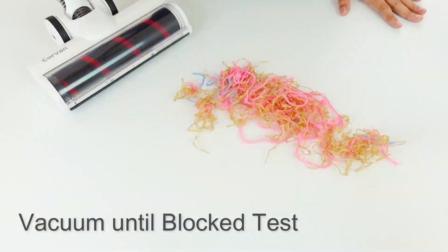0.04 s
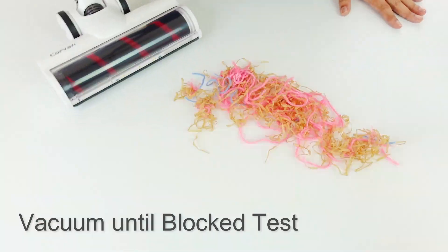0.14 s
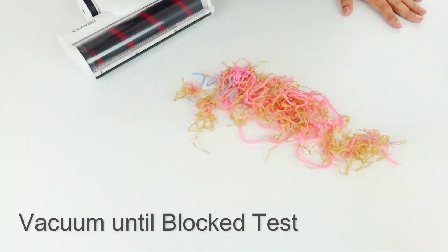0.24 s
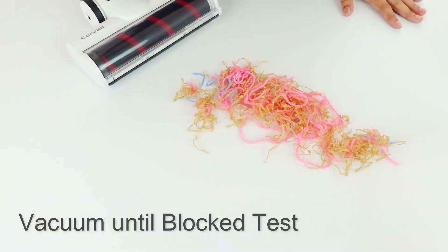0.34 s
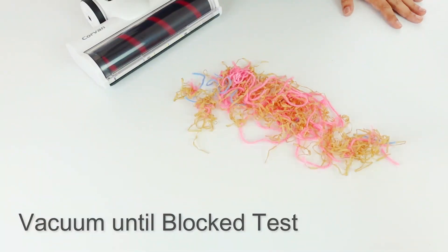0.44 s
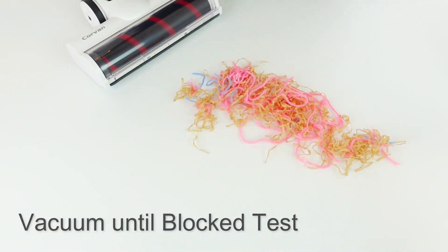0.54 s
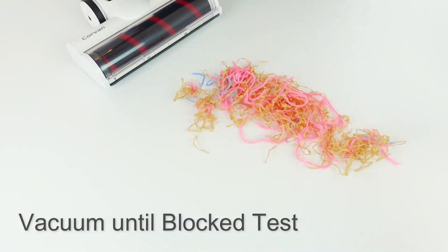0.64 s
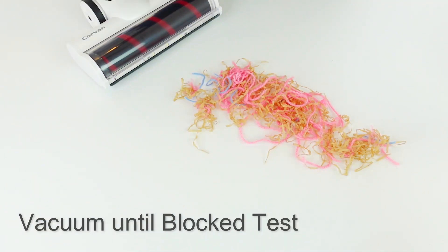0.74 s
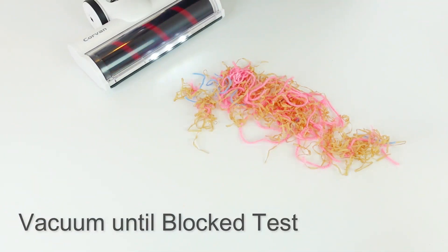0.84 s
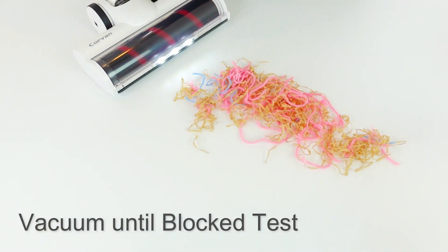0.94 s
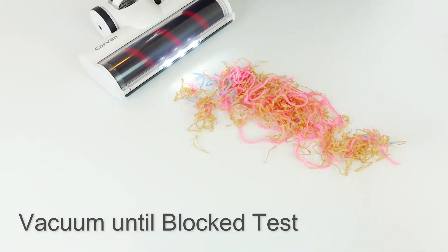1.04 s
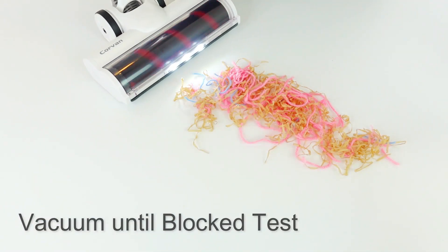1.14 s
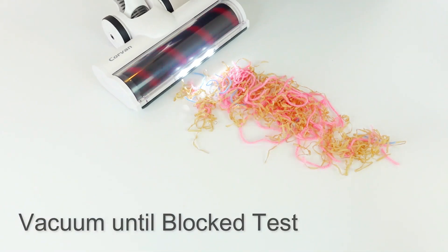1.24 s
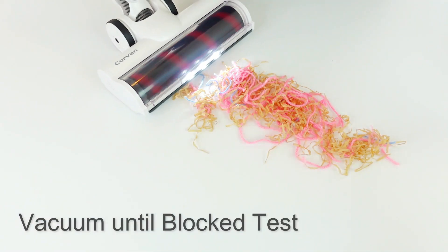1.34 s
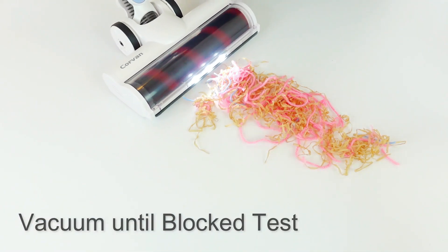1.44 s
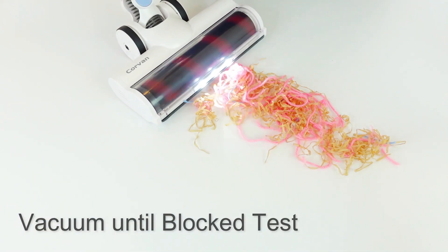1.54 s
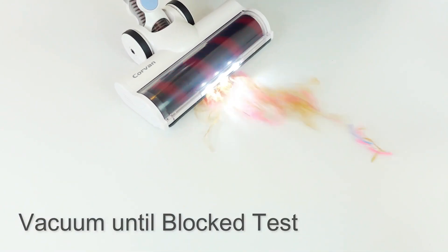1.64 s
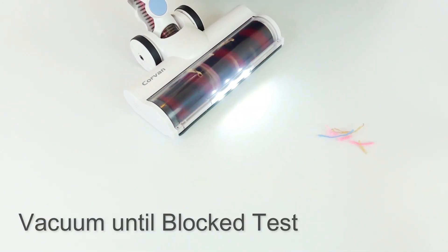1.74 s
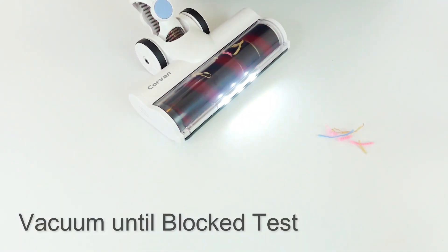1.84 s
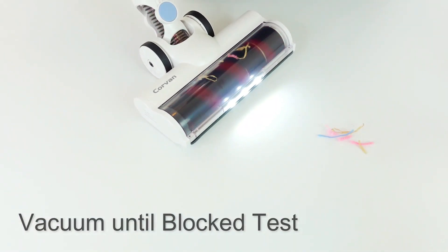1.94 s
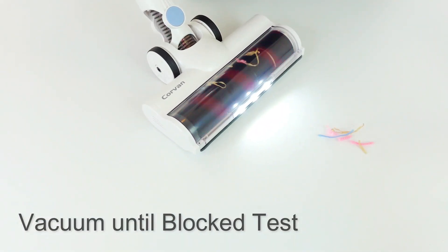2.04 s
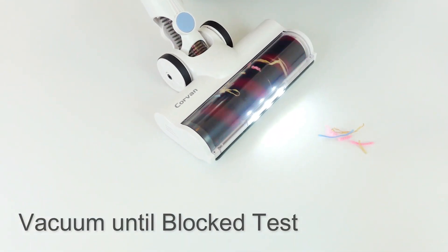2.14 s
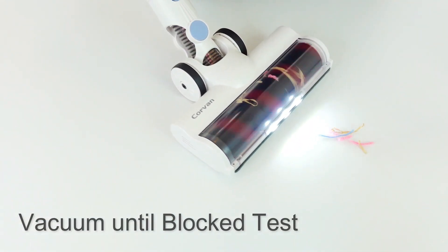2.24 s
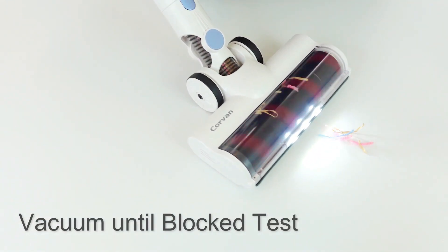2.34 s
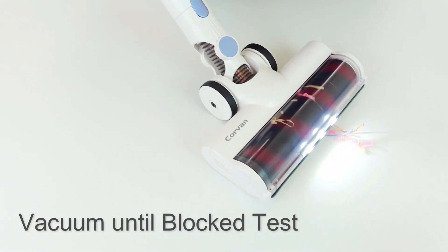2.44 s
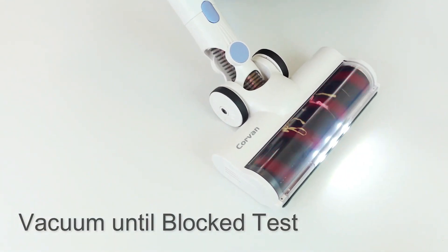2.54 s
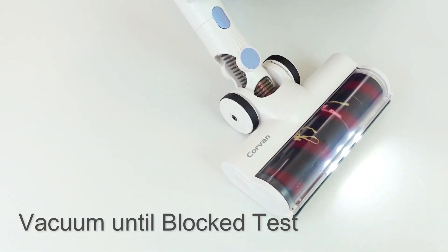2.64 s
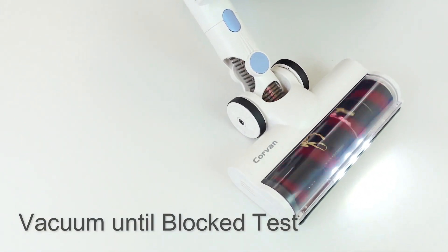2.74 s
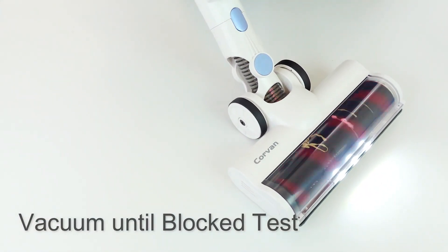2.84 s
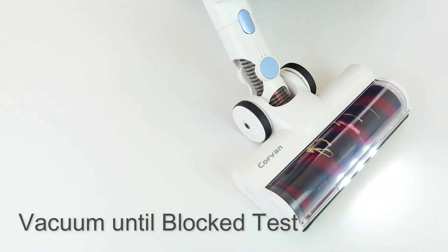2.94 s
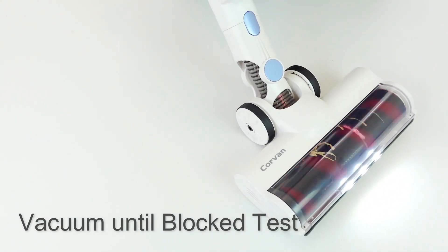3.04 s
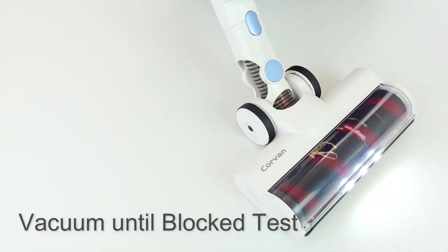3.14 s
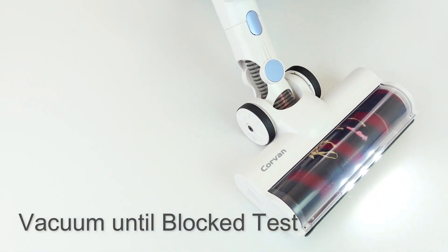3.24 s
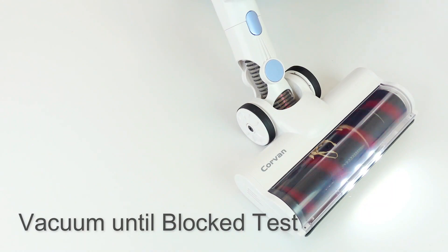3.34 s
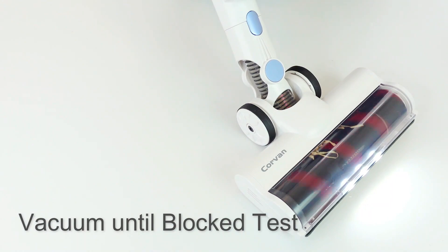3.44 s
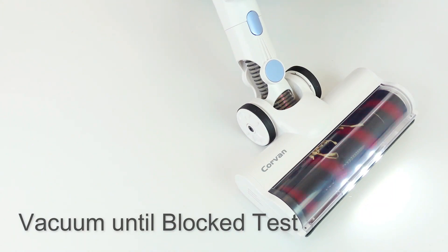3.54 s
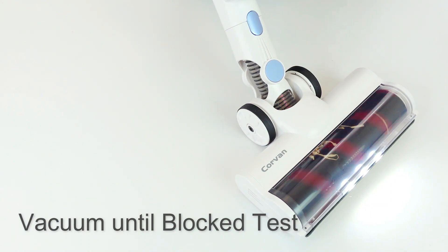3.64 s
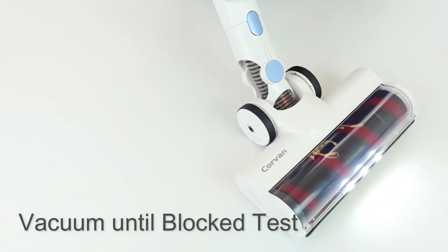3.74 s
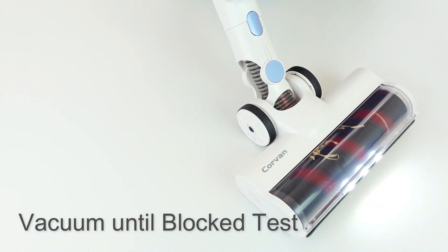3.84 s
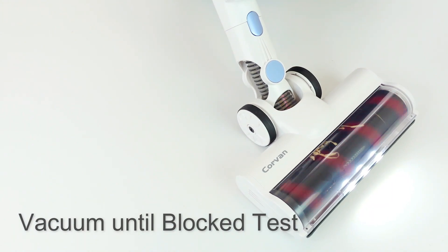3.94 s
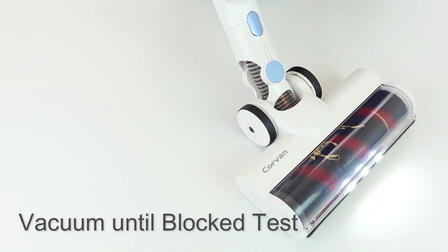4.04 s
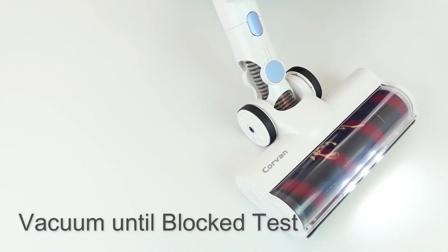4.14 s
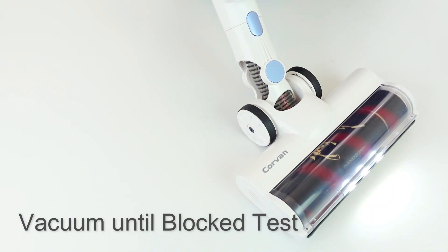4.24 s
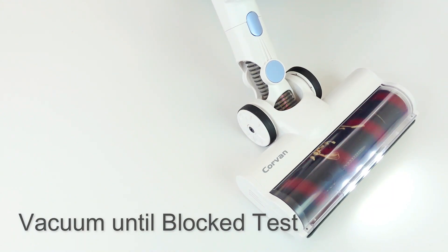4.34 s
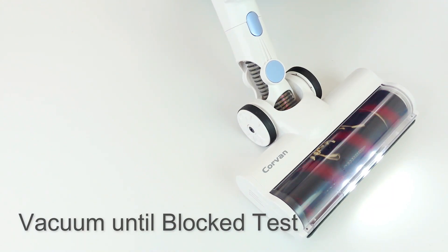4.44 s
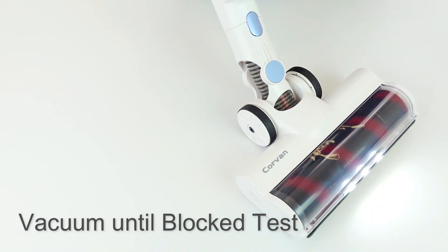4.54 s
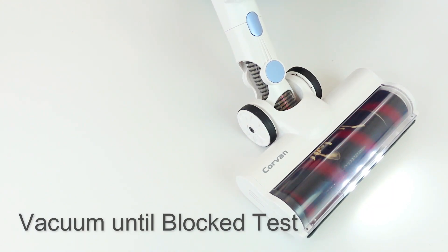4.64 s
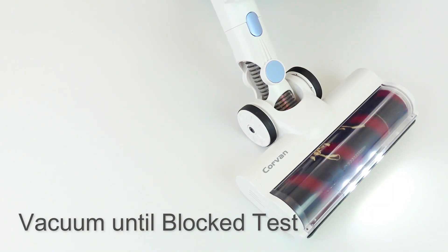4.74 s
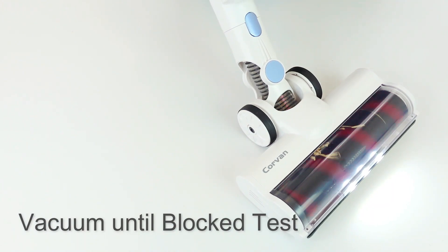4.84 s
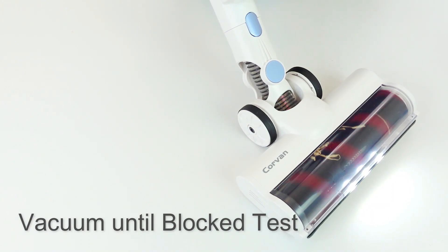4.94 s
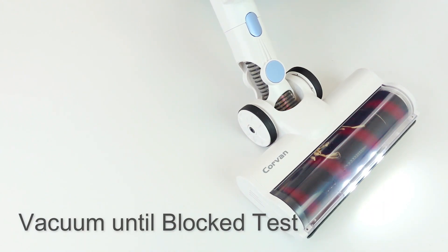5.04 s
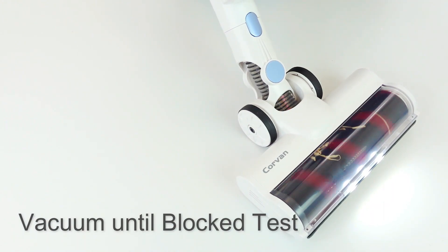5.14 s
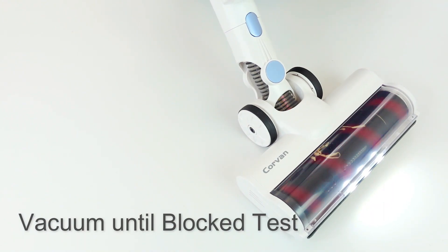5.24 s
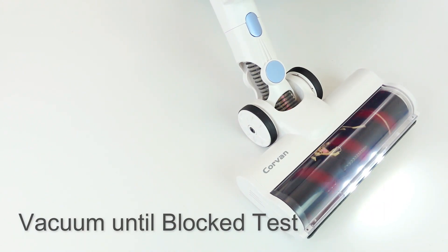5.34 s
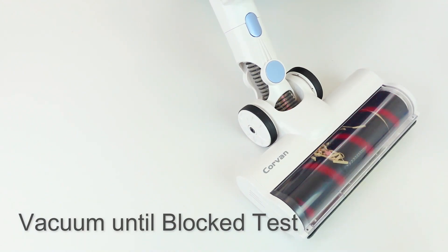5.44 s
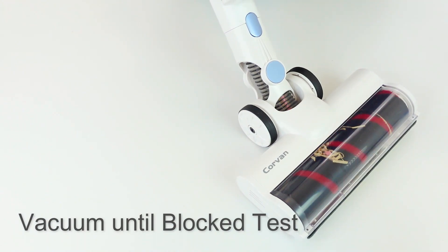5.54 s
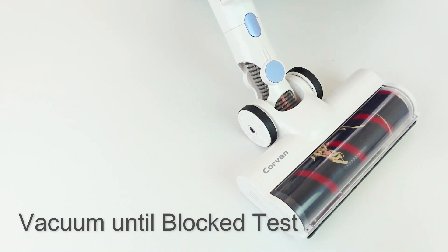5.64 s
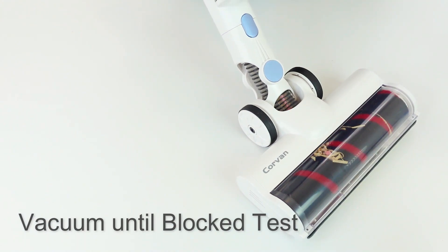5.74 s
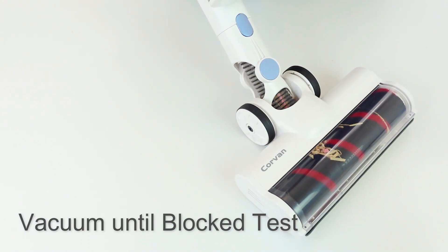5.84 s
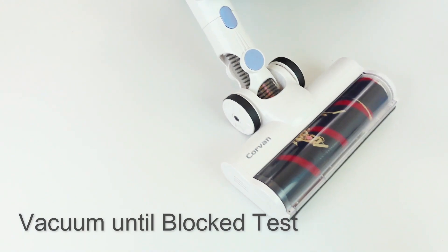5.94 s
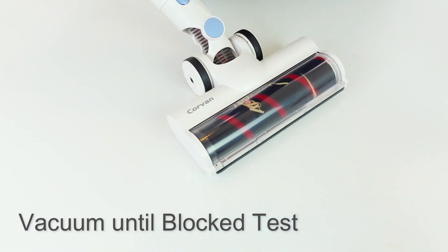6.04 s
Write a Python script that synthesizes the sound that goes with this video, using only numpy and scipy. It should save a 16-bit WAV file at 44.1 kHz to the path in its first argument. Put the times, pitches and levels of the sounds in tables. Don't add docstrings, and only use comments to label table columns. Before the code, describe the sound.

Quiet handling comes first: hissy rubs, a hollow scrape, a dull table bump and small ticks. Then a cordless vacuum starts, its broad airy rush dominating the whining fan and brush motors. As yarn loads it, the whine jumps upward and the rush becomes thin and hissy, until the blockage clears with a short swell of roar. Steady airflow and a high whine follow, then a quick falling spin-down. Close indoor pickup, dry, wide out-of-phase stereo.

```python
import sys
import numpy as np
from scipy import signal
from scipy.io import wavfile
from scipy.ndimage import uniform_filter1d

SR = 44100
rng = np.random.default_rng(int(sys.argv[2]) if len(sys.argv) > 2 else 0)


def dump(signal):
    limited = np.clip(np.atleast_2d(signal).T, -1, 1)
    pcm = np.round(limited * 32767).astype(np.int16)
    wavfile.write(sys.argv[1], SR, pcm)


def invert_db(x):
    u = np.asarray(x, float) / 20
    return 10 ** u


N = 268304
T = np.arange(N) / SR
HOP, SIZE = 256, 1024
HZ = np.fft.rfftfreq(SIZE, 1 / SR)
CUT_S, ON_S, OFF_S = 0.026, .72, 5.47


def evened(x):
    return x / np.sqrt(np.mean(x ** 2) + 1e-20)


def curve(rows, t=T):
    s, *columns = np.transpose(rows)
    return np.array([np.interp(t, s, c) for c in columns])


def colour(rows, hz):
    f, *columns = np.transpose(rows)
    return np.array([np.interp(np.log(hz + 1), np.log(f), c) for c in columns])


def during(rows, fade_s=0.014):
    fade_in = T - rows[0][0]
    fade_out = rows[-1][0] + fade_s - T
    return np.clip(np.minimum(fade_in, fade_out) / fade_s, 0, 1)


def drift(hz):
    slow = signal.butter(2, hz, fs=SR, output="sos")
    return evened(signal.sosfilt(slow, rng.standard_normal(N)))


def blurred(x, over_time, over_hz, time_axis):
    x = uniform_filter1d(x, size=over_time, axis=time_axis)
    return evened(uniform_filter1d(x, size=over_hz, axis=1 - time_axis))


def noise(field_db, patchy_db, flicker_db):
    frames = N // HOP + 5
    a, b, patches = rng.standard_normal((3, frames, SIZE // 2 + 1))
    patches = blurred(patches, 10, 12, time_axis=0)
    flicker = evened(uniform_filter1d(rng.standard_normal((frames, 1)), size=4, axis=0))
    gain = invert_db(field_db) * np.ones((frames, 1))
    gain = gain / np.sqrt((gain ** 2).sum(1, keepdims=True))
    z = (a + 1j * b) * gain * invert_db(patchy_db * patches + flicker_db * flicker)
    return evened(signal.istft(z.T, nperseg=SIZE, noverlap=SIZE - HOP)[1][:N])


# t/s, state (0 open, 1 choked, 2 cleared, 3 coasting)
PATH = [
    (.7, 0.21),
    (1, 0.1),
    (2.3, 0.18),
    (2.7, 0.44),
    (3.215, 1.15),
    (3.25, 2.01),
    (4.4, 1.943),
    (5.5, 1.95),
    (5.9, 2.96),
]


def shares(t):
    state = curve(PATH, t)[0][:, None]
    return np.clip(1 - abs(state - np.arange(4)), 0, 1)


# t/s, level/dB
FLOW = [(.72, -39), (.9, -37.5), (1.1, -38.5), (2.45, -38), (2.7, -36), (3.25, -36), (3.45, -36.5),
        (3.9, -35.5), (4.5, -38), (5, -40), (5.53, -39), (5.65, -48), (5.8, -56), (5.95, -63),
        (6.08, -70.5)]
# f/Hz, level/dB when open, choked, cleared, coasting
AIR = [(90, -19.5, -13, -32, -2), (271, -3, -12.5, -3.5, 8), (656, -9.5, -18, -4, -4),
       (1160, -8.5, -8.5, -5, 0), (1990, -11.5, -2, -7.5, -14), (2980, -16, -7, -12, -10.5),
       (3700, -22, -10, -5.5, -15), (4850, -21.5, 15, -14.5, 2.5), (5400, -19, 4.5, -11.5, -15),
       (7960, -8, 9, 3.5, -1.5), (9580, -12, -4, -5.5, -25), (11000, -20, -37, -15.5, -76),
       (14400, -35, -10, -23.5, -57), (16200, -89, -51, -34, -45)]
# f/Hz, width/Hz, level/dB when open, choked, cleared, coasting
DUCT = [(2370, 300, 7, 0.5, 0, -15), (3167, 210, -0.5, 20, 0, -1), (4134, 630, -3, -7, -2.5, -23),
        (4994, 740, 5, -0.5, 8.5, -8), (6200, 500, 0, 2.5, -1.5, -4), (7560, 120, 8, 3.5, 3.5, -5)]
# t/s, level/dB, upper edge f/Hz
RUMBLE = [(.76, -18, 198), (.85, -39, 224), (1.05, -47, 280), (1.25, -48, 229), (1.35, -20, 199),
          (1.54, -5, 270), (3.9, -2, 322), (4.3, 3.5, 570), (4.9, -7, 583), (5.05, -7, 402),
          (5.15, -44, 352), (5.3, -15, 306), (5.6, -12.5, 300), (5.85, -44, 297), (6, -8, 250)]
# f/Hz, width/Hz, level/dB
TUBE = [(501, 95, -2), (689, 75, -2), (792, 60, -14)]
# level/dB when open, choked, cleared, coasting
ROAR_DB = (-7, -43.5, -12.5, -10)


def air():
    rush_db = curve(FLOW)[0]
    frame_s = np.arange(N // HOP + 5) * HOP / SR
    duct_db = sum(np.outer(db, 1 / (1 + (2 * (HZ - f) / w) ** 4)) for f, w, *db in DUCT)
    rumble_db, edge_hz = curve(RUMBLE, frame_s)[..., None]
    rumble_db = rumble_db / (1 + (HZ / edge_hz) ** 10)
    rush_colour = shares(frame_s) @ (colour(AIR, HZ) + duct_db) + rumble_db
    rush = noise(rush_colour, patchy_db=0.5, flicker_db=0.35)

    gulp_s, gulp_length_s, gulp_db = 3.23, .27, 5.5
    gulp = 1. * (abs(T - gulp_s - gulp_length_s / 2) < gulp_length_s / 2)
    roar_db = rush_db + shares(T) @ ROAR_DB + gulp_db * uniform_filter1d(gulp, size=2000)
    tube = sum(invert_db(db) / (1 + (2 * (HZ - f) / w) ** 2) for f, w, db in TUBE)
    roar = noise(20 * np.log10(tube), patchy_db=3.0, flicker_db=-0.5)
    return (invert_db(rush_db) * rush + invert_db(roar_db) * roar) * during(FLOW, .07)


def motor(rows, orders, levels_db, wobble, waver_db):
    turns = np.cumsum(curve(rows)[0] * (1 + wobble * drift(27.3))) / SR
    whine = np.zeros(N)
    for k, db in zip(orders, levels_db):
        line = np.sin(2 * np.pi * (k * turns + rng.random()))
        whine += invert_db(db + waver_db * drift(10.3)) * line
    return np.sqrt(2) * whine * during(rows)


# t/s, f/Hz
FAN = [(.745, 265), (.78, 370), (.815, 460), (.87, 545), (.95, 614), (1.1, 683), (1.45, 706), (1.75, 714),
       (1.9, 738), (2.41, 745), (2.5, 838), (2.6, 912), (2.79, 964), (2.92, 1075), (3.17, 1220),
       (3.22, 1240), (3.42, 1234), (3.5, 1310), (3.6, 1343), (5.5, 1347), (5.7, 780), (6.085, 345)]
FAN_ORDERS = (1, 2, 4, 5, 6, 8)
# running level/dB, extra level/dB from starting torque, when choked, when cleared
FAN_LEVELS = [(-60, 11, -4, 2), (-67, 9, -2, 4), (-60, -4, 5, -1), (-69, 0, 14, -12), (-78, 14, 15, -5),
              (-80, 24, 0, 0)]
# t/s, first line level/dB, higher lines level/dB
LULL = [(1, 0, 0), (1.08, -9, -5), (1.15, -9, -12), (1.4, -9, -12), (1.46, 2, -12), (1.7, 1, -10),
        (1.78, -2, 0), (2.9, 0, 0), (2.97, 0, -9), (3.14, 0, -9), (3.19, 0, 0), (3.42, 0, 0), (3.46, 0, -6),
        (3.5, 0, 5), (3.58, 0, 6), (3.65, 0, 0)]
# f/Hz, width/Hz, level/dB
HOUSING = [(365, 90, 19), (2500, 90, 9), (1950, 120, 7), (4150, 200, 6), (870, 50, 10), (3300, 200, 2),
           (4700, 250, 6), (2960, 70, 6), (718, 20, 7)]


def fan():
    shaft_hz = curve(FAN)[0]
    torque = np.maximum(T - ON_S, 0) / .14
    causes = np.column_stack([np.ones(N), torque * np.exp(1 - torque), shares(T)[:, 1:3]])
    coast_db = -17 * np.clip((T - OFF_S) / 0.096, 0, 1)
    lull_db = curve(LULL)
    levels_db = []
    for k, row in zip(FAN_ORDERS, FAN_LEVELS):
        housing_db = sum(db / (1 + ((k * shaft_hz - f) / width) ** 2) for f, width, db in HOUSING)
        levels_db.append(causes @ row + lull_db[int(k > 1)] + coast_db * k ** 0.41 + housing_db)
    return motor(FAN, FAN_ORDERS, levels_db, wobble=0.004, waver_db=2.2)


# t/s, f/Hz
BRUSH = [(1.05, 36), (1.2, 56), (1.3, 69), (1.47, 88), (1.57, 99), (1.65, 112), (1.75, 124), (1.82, 125.6),
         (1.9, 122.2), (5.4, 122)]
BRUSH_ORDERS = (2.28, 3.2, 6, 8, 9, 10, 11)
# heard from t/s, level/dB dragging yarn, level/dB once free
BRUSH_LEVELS = [(1.604, -54, -79.5), (1.57, -50.5, -72.5), (1.6, -54, -77.5), (1.9, -72, -89),
                (1.66, -43, -65), (1.6, -43, -62), (2, -51.5, -66)]
# t/s, level/dB, speed wobble (fraction)
OVERSHOOT = [
    (1.6, 0, .004),
    (1.66, -2, .008),
    (1.72, -4, .012),
    (1.83, -6, .012),
    (1.87, 3, .003),
    (1.95, 0, .002),
]


def brush():
    rise_s, slip_s, free_s = 0.1, 2.47, 3.07
    faint_db, spin_up_db = -88, -50.5
    levels_db = []
    for s, drag_db, free_db in BRUSH_LEVELS:
        rows = [(s - rise_s, faint_db), (s, drag_db), (slip_s, drag_db - 6), (free_s, free_db)]
        levels_db.append(curve(rows)[0])
    spin_up = [(1.1, faint_db), (1.16, spin_up_db), (1.6, spin_up_db), (1.7, -99)]
    levels_db[5] = np.maximum(levels_db[5], curve(spin_up)[0])
    fade_db, wobble = curve(OVERSHOOT)
    return motor(BRUSH, BRUSH_ORDERS, levels_db + fade_db, wobble=wobble, waver_db=0.5)


def chopper():
    rows = [(.872, -53.5), (.886, -37.5), (1.2, -35.5), (1.599, -39), (1.7, -59.5)]
    tone = np.sin(2 * np.pi * 1001.7 * T)
    return np.sqrt(2) * invert_db(curve(rows)[0] + drift(6)) * tone * during(rows)


# peak t/s, rubbing level/dB, scraping level/dB, rise t/s, fall t/s
STROKES = [
    (.062, -47, -55, .025, 0.21),
    (0.104, -43, -65, 0.069, 0.29),
    (.17, -48, -67, 0.2, .08),
    (.285, -36.5, -57, 0.1, 0.16),
    (0.316, -37, -37, .008, 0.2),
    (.355, -44, -36.5, 0.15, 0.09),
    (.524, -43, -52, 0.018, 0.03),
    (.56, -58, -62, .05, .15),
    (.635, -41.5, -76, 0.066, .07),
    (.71, -63, -71, 0.069, .03),
]


def strokes_db(peaks_db):
    s, rise, fall = np.transpose(STROKES)[[0, 3, 4], :, None]
    t = T - s
    change_db = 27 * np.maximum(t / fall, -t / rise)
    return np.maximum((peaks_db[:, None] - change_db).max(0), -63)


# f/Hz, level/dB
RUB = [(100.0, -40), (300.0, -24), (700.0, -15), (1500.0, -11.2), (2600.0, -16.4), (3600.0, -17.5),
       (4700.0, -15.3), (6000.0, -9.9), (8200.0, 0.0), (10500.0, -14.1), (15000.0, -26.2)]
# f/Hz, level/dB
BODY = [(100, -40), (300, -22), (700, -8), (1200, -2), (1650, 0), (2100, -9), (2600, -9), (3600, -18),
        (6000, -20), (10500, -30), (15000, -42)]


def strokes():
    rub_db, scrape_db = map(strokes_db, np.transpose(STROKES)[1:3])
    rub = invert_db(rub_db) * noise(colour(RUB, HZ)[0], patchy_db=2.0, flicker_db=0.1)
    scrape = invert_db(scrape_db) * noise(colour(BODY, HZ)[0], patchy_db=2.0, flicker_db=-0.5)
    return (rub + scrape) * during([[CUT_S], [ON_S]])


def ring(s, hz, db, t60, rise_s):
    t = np.maximum(T - s, 0)
    return invert_db(db - 60 * t / t60) * (1 - np.exp(-t / rise_s)) * np.sin(2 * np.pi * hz * t)


# t/s, f/Hz, level/dB, 60 dB decay t/s, rise t/s
TABLE = [(.338, 122, -25, .26, .06), (.36, 290, -32, .1, .04), (.322, 480, -43, .08, .006),
         (.255, 1420, -43, .15, .03), (.313, 1650, -36, .06, .002), (.345, 720, -40, .12, .01),
         (.523, 500, -44, .06, .003), (.525, 860, -43, .04, .001), (.526, 1230, -43, .04, .001),
         (.515, 2200, -46, .06, .003), (.725, 240, -50, .15, .015)]


def bump():
    return sum(ring(*row) for row in TABLE)


def snap(s, db, t60):
    t = T - s
    band = signal.butter(2, (1300, 9500), "band", fs=SR, output="sos")
    burst = signal.sosfilt(band, rng.standard_normal(N))
    drop = np.where(t > 0, t / t60, np.minimum(-t / 0.05, 5))
    return invert_db(db - 60 * drop) * burst


# t/s, peak level/dB
TICKS = [
    (.052, -43),
    (.316, -37),
    (1.572, -39),
    (.096, -43),
    (.516, -41),
    (.527, -35),
    (.704, -40),
    (.753, -30),
]


def ticks():
    return sum(snap(s, db, t60=0.035) for s, db in TICKS)


# f/Hz, level/dB
LATCH_COLOUR = [(100.0, -40), (300.0, -20), (700.0, -16.1), (1500.0, -19.2), (2600.0, -4.7), (3600.0, -5.2),
                (4700.0, 0.0), (6000.0, -20.2), (8200.0, -7.1), (10500.0, -35.5), (15000.0, -44.4)]


def latch():
    s, rise_s, hold_s, latch_db, fall_db_per_s = .696, .008, .052, -39, -280
    held_s = s + rise_s + hold_s
    rows = [(s, latch_db - 21), (s + rise_s, latch_db), (held_s, latch_db),
            (held_s + 0.24, latch_db + 0.097 * fall_db_per_s)]
    rattle = noise(colour(LATCH_COLOUR, HZ)[0], patchy_db=0.0, flicker_db=-0.5)
    return invert_db(curve(rows)[0]) * rattle * during(rows)


# t/s, level/dB
MURMUR = [(.04, -58), (.2, -62), (.24, -66), (.32, -89), (.35, -65), (.45, -60), (.72, -62.5), (.8, -72)]


def murmur():
    dull_db = -40 * np.log10(1 + (HZ / 400) ** 2) - 20 * np.log10(1 + (150 / (HZ + 1)) ** 2)
    return invert_db(curve(MURMUR)[0]) * noise(dull_db, patchy_db=2, flicker_db=1) * during(MURMUR)


# f/Hz, level/dB
EARLIER = [(100.0, -8), (300.0, -6), (700.0, -4), (1500.0, -20), (2600.0, -14), (3600.0, -18),
           (4700.0, -13), (6000.0, -14.5), (8200.0, -6.5), (10500.0, -14), (15000.0, -20.0)]


def earlier():
    rush = noise(colour(EARLIER, HZ)[0], patchy_db=-1.5, flicker_db=0.5)
    return invert_db(-40.5) * rush * np.clip((CUT_S - T) / 0.0051, 0, 1)


def floor():
    return invert_db(-65.5) * noise(colour(RUB, HZ)[0] * 0.2, patchy_db=9.0, flicker_db=1.5)


def scene():
    machine = air() + fan() + brush() + chopper()
    handling = strokes() + bump() + ticks() + latch() + murmur()
    mono = machine + handling + earlier() + floor()
    mono = signal.sosfilt(signal.butter(3, 94, "high", fs=SR, output="sos"), mono)
    return np.array([mono, mono])


# phase lag/rad, edge f/Hz at the bend, bend t/s, slide before/(Hz/s), slide after/(Hz/s)
BANDS = [(3.0, 1250, 2.7, 60, -390), (-1.36, 1600, 3.2, -280, 130), (-.87, 2300, 2.2, 200, -50),
         (2.85, 3100, 1.45, 700, -1300), (-.6, 3450, 1.45, 150, -800), (1.2, 3800, 4, 0, -800),
         (.2, 5250, 1.55, -400, -3500), (-1.45, 5750, 3.4, 0, -820), (3.142, 6950, 1.7, -300, -750),
         (.05, 7300, 2.2, 1000, -360), (2.33, 7620, 1.8, -250, -250), (-1.77, 8750, 1.8, 450, -1900),
         (2.48, 8850, 2.3, 900, -520), (-1.17, 8800, 1.8, -400, -3000), (-2.45, 10250, 1.55, 2500, -400),
         (2.78, 10500, 1.3, -700, -1000), (.8, 10800, 4.5, -40, -900)]


def band_turns(hz, t):
    wander = blurred(rng.standard_normal((len(hz), len(t))), 14, 40, time_axis=1)
    seen_hz = hz[:, None] * (1 + .012 * wander) + 35 * wander
    lag, edge_hz, bend, before, after = np.transpose(BANDS)[..., None]
    edges = edge_hz + before * np.minimum(t - bend, 0) + after * np.maximum(t - bend, 0)
    edges = np.maximum.accumulate(edges)
    band = (seen_hz > edges[:, None]).sum(0)
    return np.append(lag, np.pi)[band], band == 0, seen_hz


# from t/s, until t/s, low f/Hz, high f/Hz, phase lag/rad
ISLANDS = [(0, .45, 900, 2000, .4), (.22, .72, 0, 900, 2.6), (.42, .51, 0, 250, 3.0),
           (.5, .55, 300, 1400, 1.5), (.72, 1.25, 5450, 5850, 2.25), (.72, 1.4, 5850, 6250, -1.54),
           (.72, .82, 6250, 7300, 2.33), (.82, 1.06, 6600, 7300, 2.33), (.5, .69, 5500, 6150, 3.142),
           (1.2, 1.65, 2600, 2950, 3.142), (2.55, 2.78, 600, 900, 3.142), (2.85, 3.1, 12700, 13600, 1.2),
           (.86, 1.19, 11050, 15300, 0), (2.1, 3.3, 3800, 4150, 2.4), (2.45, 2.8, 11600, 12500, 0),
           (2.84, 3.07, 270, 950, 3.142), (2.75, 2.84, 620, 900, 3.142), (5.2, 6.1, 0, 500, -1.36),
           (3.07, 3.21, 0, 800, 3.142), (3.06, 3.22, 800, 1100, -1.36), (3.215, 3.34, 0, 800, 2.75),
           (3.22, 3.5, 800, 1250, 2.2), (2.5, 2.75, 130, 300, 2.75), (4.72, 5.75, 13700, 15100, 0),
           (5.1, 5.75, 13100, 13700, -.4), (4.89, 4.97, 2630, 2820, 3.142), (4.97, 5.18, 2220, 2950, 3.142),
           (5.18, 5.42, 2280, 2800, 3.142)]
# from t/s, until t/s, low f/Hz, high f/Hz, phase lag/rad
SMALL_ISLANDS = [(.85, 1.45, 0, 230, 3.142), (1.55, 2.25, 0, 300, 2.82), (2.25, 2.45, 0, 170, 3.142),
                 (2.75, 3.07, 0, 270, 2.75), (.72, .95, 230, 950, 2.9), (3.5, 3.8, 0, 150, 2.5),
                 (3.45, 3.85, 700, 930, 2.95), (3.87, 4.3, 640, 850, -1.36), (4.4, 4.85, 400, 610, 2.9),
                 (1.57, 1.66, 1050, 1500, -.8), (2.55, 2.76, 2130, 2250, 3.142),
                 (3.85, 4.45, 0, 110, 3.142), (4.45, 5.3, 0, 150, 3.142), (5.42, 5.58, 2050, 2650, 3.142),
                 (5.58, 5.82, 2600, 2900, 3.142), (5.82, 5.95, 2480, 2680, 3.1),
                 (5.95, 6.1, 2250, 2520, 3.1)]


def right_turns(hz, t):
    turn, bass, seen_hz = band_turns(hz, t)
    turn[bass & (hz[:, None] > 940) & (t < 2.8)] = 2.5
    strips = rng.uniform(-1, 1, (len(hz) // 8 + 1, len(t) // 10 + 1, 2))
    strips = strips[np.arange(len(hz))[:, None] // 8, np.arange(len(t)) // 10]
    stray_turn = np.pi * strips[..., 0]
    chance = (strips[..., 1] + 1) / 2
    turn += bass * (.12 * strips[..., 1] - .02)
    gaps = blurred(rng.standard_normal(turn.shape), 7, 2, time_axis=1)
    turn[bass & (turn > 2.8) & (gaps > .6) & (t > 1)] = np.pi
    scattered = chance < np.interp(t, [.03, .35], [0, 1])
    turn = np.where(t < ON_S, stray_turn * scattered, turn)
    flecks = chance < np.interp(t, [1.3, 1.4, 2.05, 2.2, 5.7, 5.8], [0, .6, .5, .004, .004, .5])
    turn = np.where(flecks & (hz[:, None] > 11000), stray_turn, turn)
    for start, end, low_hz, high_hz, lag in ISLANDS + SMALL_ISLANDS:
        inside_hz = (abs(seen_hz) >= low_hz) & (seen_hz < high_hz)
        turn[(t >= start) & (t < end) & inside_hz] = lag
    return turn + 0.25 * np.sin(turn) * rng.standard_normal(turn.shape)


def band_limit(x):
    return signal.sosfilt(signal.butter(12, 15770, fs=SR, output="sos"), x)


def record(dry):
    hz, t, z = signal.stft(dry[1], SR, nperseg=1024, noverlap=768)
    turn = right_turns(hz, t)
    turned = z * invert_db(.5 * abs(np.sin(turn))) * np.exp(-1j * turn)
    right = signal.istft(turned, SR, nperseg=1024, noverlap=768)[1][:N]
    return band_limit(np.array([dry[0], right]))


dry = scene()
out = record(dry)
dump(out)
```